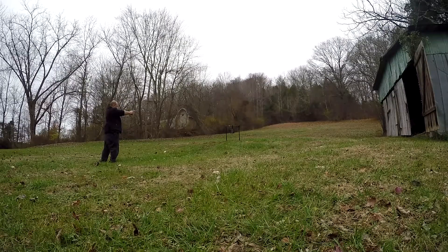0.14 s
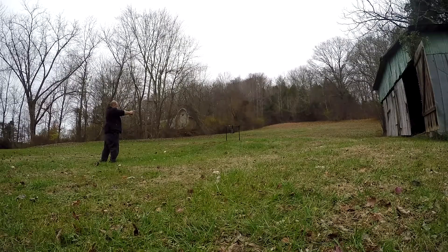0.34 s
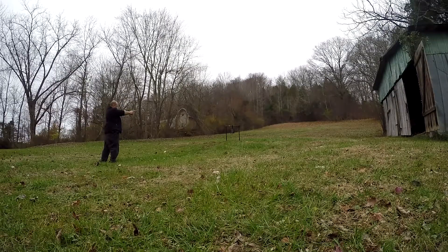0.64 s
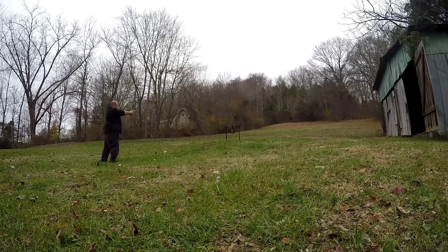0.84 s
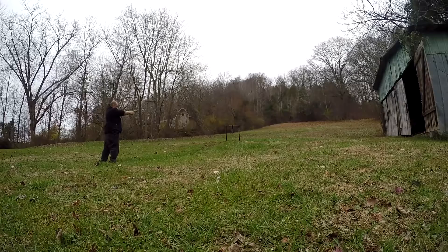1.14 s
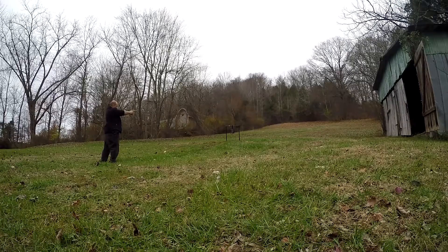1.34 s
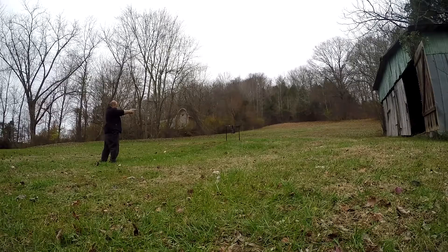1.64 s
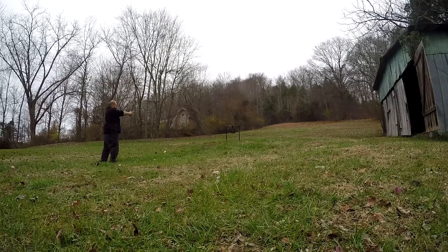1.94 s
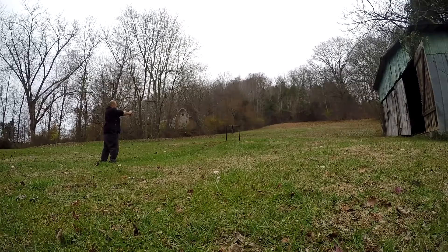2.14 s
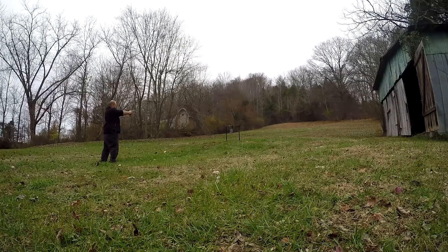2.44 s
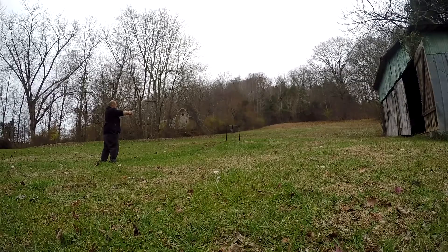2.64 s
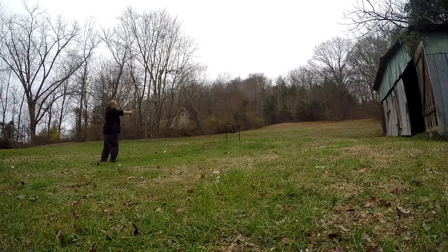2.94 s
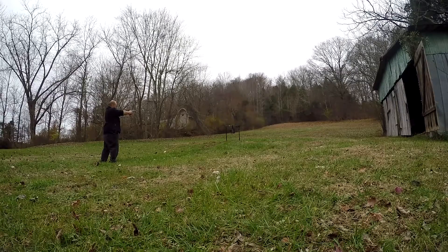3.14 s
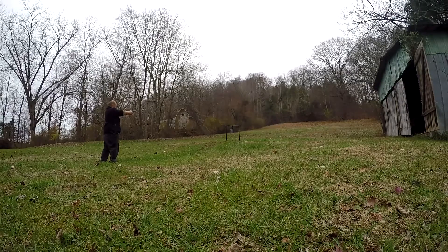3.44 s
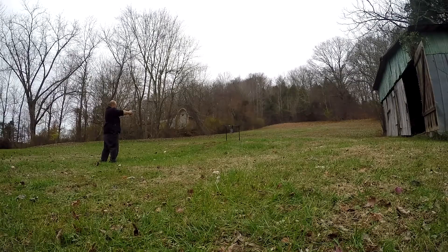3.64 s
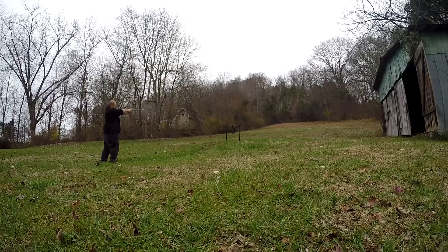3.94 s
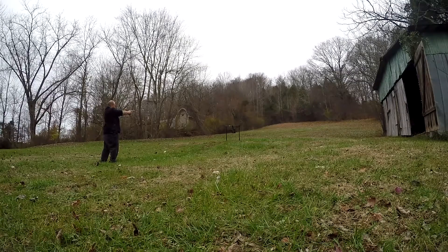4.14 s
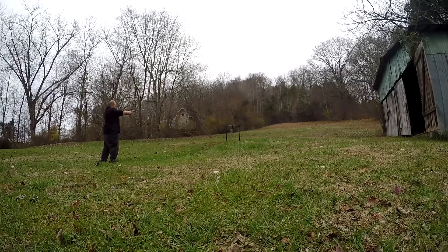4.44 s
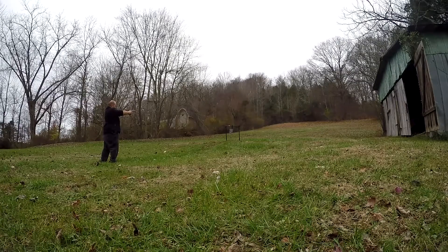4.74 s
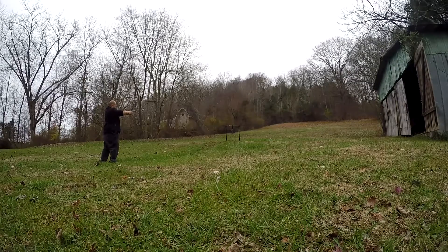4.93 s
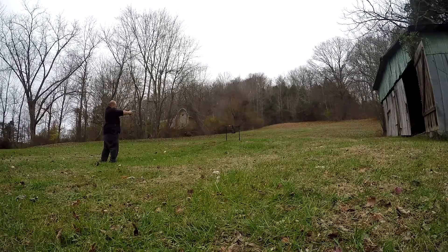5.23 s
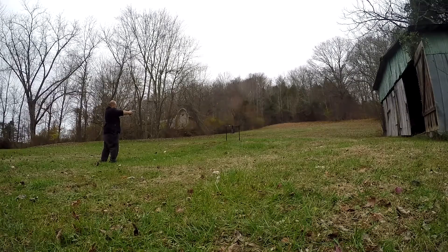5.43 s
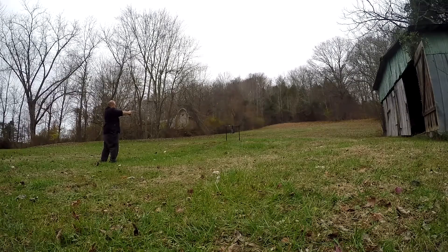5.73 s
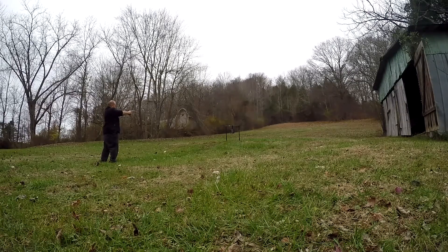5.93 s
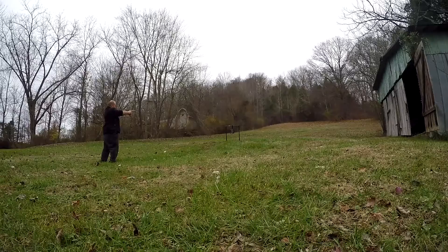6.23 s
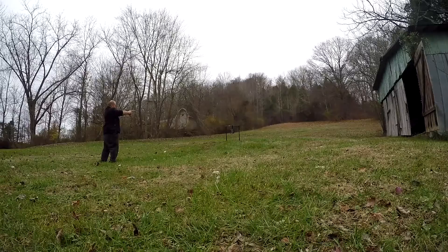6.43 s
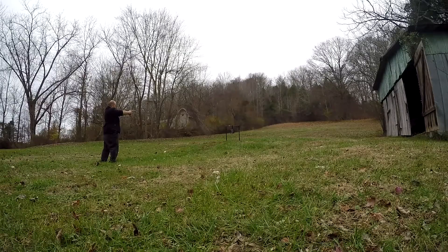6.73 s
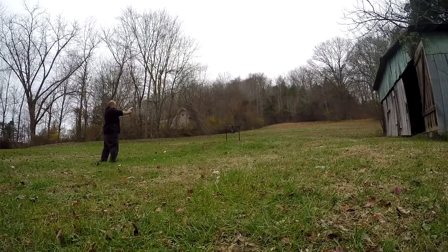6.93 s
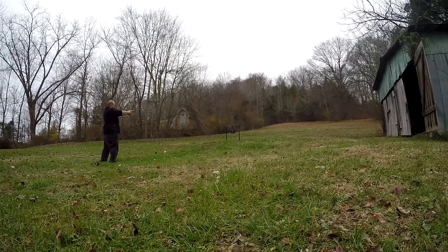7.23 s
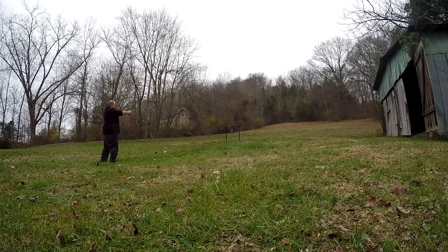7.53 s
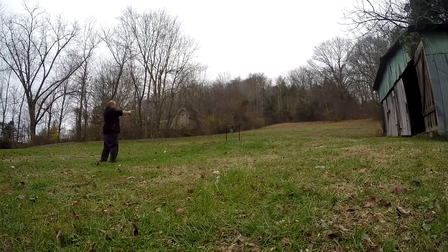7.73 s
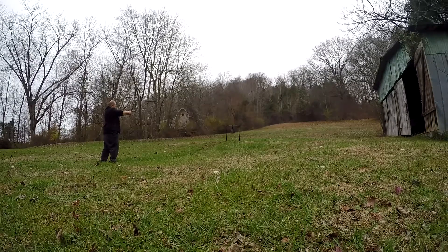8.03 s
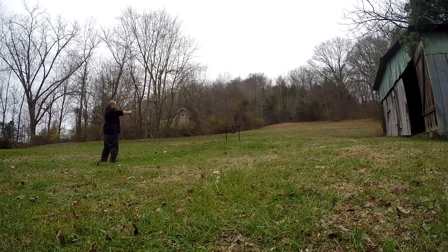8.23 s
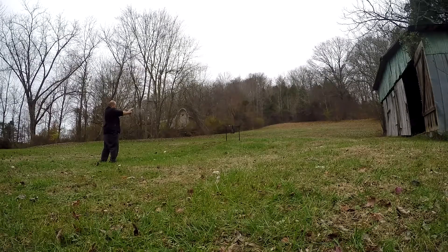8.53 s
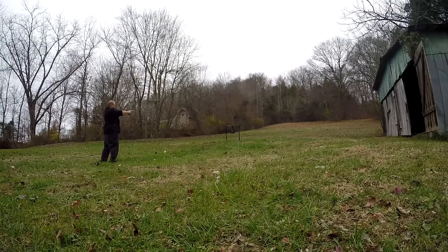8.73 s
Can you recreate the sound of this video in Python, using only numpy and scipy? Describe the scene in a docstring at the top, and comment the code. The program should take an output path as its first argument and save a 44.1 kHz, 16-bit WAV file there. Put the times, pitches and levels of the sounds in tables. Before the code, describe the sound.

Outdoor target shooting in an open field, heard by a small overloaded microphone on the ground. Soft gusty wind comes first, then five cracking handgun blasts roughly one and a half to two seconds apart. Each hits steel with a bright smack and high ring, then shed and tree line return a dense rolling echo. The level ducks at every shot and creeps back up; a few tiny handling clicks intervene.

```python
"""A light wind, hiss and a thin whine, then five pistol shots at a steel plate in a grass field, a shed and woods near.
Each blast rings and overloads a small camera on the ground; grass noise and a low swing follow.
The plate pings about 30 ms after the shot and its high ring swells, then shed and woods return the echo.
Gain control ducks at every shot and creeps up again over the echo and wind; small clicks fall between shots.
Sources are decaying sines and noise shaped in bands."""
import sys
import numpy as np
from scipy import signal
from scipy.io import wavfile
from scipy.ndimage import uniform_filter1d

SR = 44100
rng = np.random.default_rng(int(sys.argv[2]) if len(sys.argv) > 2 else 0)


def transcribe(signal):
    """Save signal, clipped to [-1, 1], as a 16-bit WAV file at the path in sys.argv[1]."""
    frames = np.atleast_2d(signal).T
    limited = np.clip(frames, -1, 1)
    pcm = np.round(limited * 32767).astype(np.int16)
    wavfile.write(sys.argv[1], SR, pcm)


N = 391166
TIME = np.arange(N) / SR
AGE = TIME[:3 * SR]   # time since an event, s


def from_db(db):
    """Decibels to gain."""
    return 10 ** (np.asarray(db) / 20)


def rms_one(x):
    """Scale to rms 1."""
    return x / np.sqrt(np.mean(x ** 2) + 1e-20)


def fade(t, t60):
    """Decay by 60 dB in t60 seconds."""
    return np.exp(-np.log(1000) * t / t60)


def swell(t, start_s, rise_s):
    """Smooth opening from 0 towards 1 after a start time."""
    return 1 - np.exp(-(np.maximum(t - start_s, 0) / rise_s) ** 2)


def add(track, s, sound):
    """Mix a sound into a track at s seconds."""
    at = round(s * SR)
    track[at:at + len(sound)] += sound[:N - at]


def butter(x, hz, kind, order=2):
    """Causal Butterworth filter."""
    sos = signal.butter(order, hz, kind, fs=SR, output="sos")
    return signal.sosfilt(sos, x + 1e-18)


def mode(hz, t60):
    """A struck resonance: decaying sine, height 1 before decay."""
    return np.sin(2 * np.pi * hz * AGE) * fade(AGE, t60)


def lumps(t, per_s, depth_db):
    """Random gain, interpolated in dB between per_s knots a second."""
    knots = rng.standard_normal(4000)
    return from_db(depth_db * np.interp(t * per_s, np.arange(len(knots)), knots))


def coloured(table, t, patchy_db=0):
    """Noise in bands, rms 1 before decay and wavering; a third table column is the t60 of each band."""
    hz, db, *t60 = np.transpose(table)
    edges_hz = np.geomspace(15, 17000, 25)
    white = rng.standard_normal((2, len(t) + SR // 10))   # extra 0.1 s lets the filters settle
    out, power = 0, 0
    for k, (low, high) in enumerate(zip(edges_hz, edges_hz[1:])):
        log_centre = np.log(low * high) / 2
        gain = from_db(np.interp(log_centre, np.log(hz), db))
        band = gain * butter(white[k % 2], [low, high], "band")[-len(t):]
        if patchy_db:
            band = band * lumps(t, per_s=16, depth_db=patchy_db)
        if t60:
            band = band * fade(t, np.interp(log_centre, np.log(hz), t60[0]))
        out = out + band
        power += gain ** 2 * (high - low) / (SR / 2)
    return out / np.sqrt(power)


def background(air_db=-61.5, whine_db=-71.0, whine_hz=8020, buzz_hz=98, wander_hz=14):
    """Faint hiss, and a thin whine: a sine wandering in pitch, its amplitude modulated at buzz_hz."""
    # still air: (frequency [Hz], relative density [dB per Hz])
    air_spectrum = [(20, 4.5), (400, 1), (1000, -0.5), (2000, -4.5), (5500, -3.5), (7000, -13),
                    (10000, -11), (15000, -30.5)]
    wander = rms_one(butter(rng.standard_normal(N), 30, "low"))
    pitch_hz = whine_hz + wander_hz * wander
    buzz = 1 + 1.8 * np.sin(2 * np.pi * buzz_hz * TIME)
    whine = np.sin(2 * np.pi * np.cumsum(pitch_hz) / SR) * buzz
    return from_db(air_db) * coloured(air_spectrum, TIME) + from_db(whine_db) * whine


def wind(breeze_db=-41.5, rise_over_fall=0.5):
    """A steady breeze rumbles on the microphone; each gust builds faster than it dies away."""
    # wind rumble: (frequency [Hz], relative density [dB per Hz])
    rumble = [(15, 0), (30, -2), (60, -6), (100, -13.5), (160, -25), (300, -38.5), (600, -66.5),
              (2000, -95)]
    # gusts: (peak time [s], level [dB], fall time [s])
    gusts = [(.03, -34.5, 0.19), (.36, -31.5, 0.051), (0.511, -33, 0.15), (.97, -34, 0.084),
             (1.35, -42.5, .2), (3.13, -41, 0.084), (4.55, -34, 0.31), (5.15, -34, 0.12),
             (6.74, -28, 0.097), (7.5, -39, .3)]
    strength = from_db(breeze_db)
    for s, db, fall_s in gusts:
        width_s = np.where(TIME < s, rise_over_fall * fall_s, fall_s)
        strength = strength + from_db(db) * np.exp(-((TIME - s) / width_s) ** 2)
    return strength * coloured(rumble, TIME, patchy_db=2.0)


def handling(t60=0.015):
    """Short dry clicks of the pistol being handled: decaying band noise."""
    # clicks: (time [s], peak level [dB], frequency [Hz])
    clicks = [(3.1948, -48, 6570), (4.8094, -35.5, 8700), (4.839, -43, 8400), (6.8459, -19.5, 4300),
              (6.8535, -31.5, 5570), (8.2487, -47, 4220), (8.3679, -43, 4940), (8.4367, -42.5, 4180),
              (8.4986, -48, 6130)]
    out, t = np.zeros(N), AGE[:SR // 10]
    for s, db, hz in clicks:
        band_hz = [hz * 0.86, min(hz * 1.21, SR / 2.2)]
        click = butter(rng.standard_normal(len(t)), band_hz, "band") * fade(t, t60)
        add(out, s, from_db(db) * click / np.abs(click).max())
    return out


def slaps(count=14, level_db=-5.0, dull_hz=4500, t60=0.61):
    """Boards and near trunks return separate dulled copies of the blast, the same at every shot."""
    out, copy = np.zeros(len(AGE)), butter(blast(0), dull_hz, "low")
    delays_s = np.linspace(.05, .19, count) + rng.uniform(-.004, .004, count)
    for delay_s, db in zip(delays_s, rng.normal(0, 1.7, count)):
        add(out, delay_s, from_db(level_db + db) * fade(delay_s - .05, t60) * copy)
    return out


def echoes(grass_db=15, shed_db=5, woods_db=-18):
    """Decaying noise: grass scatters the blast at once, shed and nearest trees soon after, woods for seconds."""
    # grass, shed with nearest trees, woods: (frequency [Hz], relative density [dB per Hz], t60 [s])
    grass_bands = [(60, -12, 0.2), (204, 5, 0.054), (403, -1, 0.074), (676, -4, 0.066), (1370, 1.5, 0.058),
                   (2160, -12, 0.071), (4200, -13.5, 0.14), (5600, -5.5, 0.074), (8500, -27.5, 0.098),
                   (15000, -24, 0.061)]
    shed_bands = [(60, -9.5, .4), (170, -3, 0.46), (300, -3, 0.4), (700, 1.5, .33), (1173, -4, 0.49),
                  (2380, -10.5, 0.48), (4626, -11.5, 0.55), (6030, -8.5, .38), (8140, -2, 0.18),
                  (15000, -25.5, 0.083)]
    woods_bands = [(64.8, -1, 2.2), (208, -13, 5.32), (470, -7, 3.77), (1080, -0.5, 3.105),
                   (1501, -5.5, 3.02), (2460, -4, 2.18), (4830, -6, 1.874), (5510, 2.5, 1.08),
                   (8000, -9.5, 0.33), (15200, -64, 2.2)]
    t, out = AGE[:SR], np.zeros(len(AGE))

    grass = coloured(grass_bands, t) * swell(t, start_s=.0022, rise_s=.00095)
    add(out, 0, from_db(grass_db) * grass * lumps(t, per_s=400, depth_db=4.5))

    shed = coloured(shed_bands, t) * swell(t, start_s=.027, rise_s=.022)
    add(out, 0, from_db(shed_db) * shed * lumps(t, per_s=180, depth_db=2.0))

    # the far tree line answers late
    far_edge = 1 + 0.61 * swell(AGE, start_s=0.35, rise_s=0.18) * fade(np.maximum(AGE - .7, 0), 7.8)
    # single trees and clumps
    trunks = lumps(AGE, per_s=150, depth_db=1.0) * lumps(AGE, per_s=14, depth_db=1.4)
    woods = coloured(woods_bands, AGE, patchy_db=0.6) * swell(AGE, start_s=0.049, rise_s=0.16)
    return out + from_db(woods_db) * woods * far_edge * trunks


def plate_high_ring(length_factor, level_db=11.0):
    """The plate's high ring swells after the hit, then decays: a sum of damped modes."""
    # high ring: (frequency [Hz], relative level [dB], t60 before length factor [s])
    high_ring_modes = [(5995, 0, .35), (6000, -33, 1.0), (6750, -21, .12), (9600, -30, .55),
                       (10200, -32, .55), (11550, -27, .35), (12600, -35, .85), (12820, -34, .5)]
    ring = 0
    for hz, db, t60 in high_ring_modes:
        ring = ring + from_db(db + rng.normal(0, 1)) * mode(hz, t60 * length_factor)
    return from_db(level_db) * ring * swell(AGE, start_s=.04, rise_s=.034)   # age counts from the shot


def plate(smack_t60=.006, spray_db=-17.0, spray_t60=0.051, shed_db=-14.0, shed_hz=6000, shed_return_s=.068,
          linger_db=-41.5, linger_t60=3.2):
    """Lead smacks steel, fragments spray, the plate rings; the shed returns the smack, the woods the ring."""
    # hits: (time [s], smack level [dB], levels of the three main modes, set by where it lands [dB])
    hits = [(1.6586, 10.2, -0.5, -5, -10.5), (3.8695, 15, -12.5, -16.5, -22), (5.5356, 16, 6, -38, 9),
            (6.9684, 17, -12.5, -5, -15.5), (8.5750, 9.6, -14, -2.5, -14)]
    # main plate modes: (frequency [Hz], t60 [s])
    main_modes = [(2398, 0.45), (2912, 0.15), (3602, 0.26)]
    # upper plate modes, struck by every smack: (frequency [Hz], level re smack [dB], t60 [s])
    upper_modes = [(3980, -29.5, .1), (6600, -28.5, 0.1), (5995, -17, 0.08)]
    # smack of lead on steel: (frequency [Hz], relative density [dB per Hz])
    smack_spectrum = [(300, -18), (1200, 0.5), (2000, 9), (4500, 5), (6500, -3.5), (9000, -31.5),
                      (15000, -31.5)]
    out, t = np.zeros(N), AGE[:SR // 2]
    # the struck plate swings edge-on and radiates less
    facing = from_db(-17 * swell(AGE, start_s=0.039, rise_s=.055))
    for s, smack_db, *mode_db in hits:
        decay = fade(t, smack_t60) + from_db(spray_db) * fade(t, spray_t60)
        smack = from_db(smack_db) * coloured(smack_spectrum, t) * decay
        add(out, s, smack)
        add(out, s + shed_return_s, from_db(shed_db) * butter(smack, shed_hz, "low", order=4))
        for (hz, t60), db in zip(main_modes, mode_db):
            # the air swallows higher modes sooner
            woods_t60 = linger_t60 * (main_modes[0][0] / hz) ** 2
            linger = from_db(linger_db) * mode(hz, woods_t60) * lumps(AGE, per_s=28, depth_db=2.5)
            add(out, s, from_db(db) * (mode(hz, t60) * facing + linger))
        for hz, db, t60 in upper_modes:
            add(out, s, from_db(smack_db + db) * mode(hz, t60))
    return out


def thump(suction_s, suction_db, swing_db=23.5, swing_t60=0.095, swing_hz=23, swing_start_s=.005):
    """Suction follows the front; the overloaded microphone then swings slowly back to rest."""
    t = AGE[:SR // 4]
    phase = np.minimum(t / suction_s, 1)
    suction = np.sin(np.pi * phase) * np.minimum(2 * t / suction_s, 1)
    late = np.maximum(t - swing_start_s, 0)
    swing = np.sin(2 * np.pi * swing_hz * late) * fade(late, swing_t60)
    return from_db(swing_db) * swing - from_db(suction_db) * suction


def blast(front_db):
    """The shock front rings the camera housing; a sharper front drives the flagged resonances harder."""
    # housing: (frequency [Hz], width [Hz], relative level [dB], 1 if only a sharp front reaches it)
    housing = [(494, 570, -14, 0), (1023, 324, 0.5, 0), (1463, 380, -1, 0), (2890, 400, -0.5, 1),
               (4225, 500, 3, 1), (5374, 400, 2, 1), (6147, 300, -5.5, 0), (8600, 870, -11, 1),
               (13700, 1700, -10, 1)]
    t, out = AGE[:SR // 20], 0
    for k, (hz, width_hz, db, sharp) in enumerate(housing):
        level = from_db(db + front_db * (sharp > .5))
        ring = np.sin(2 * np.pi * hz * t) * np.exp(-np.pi * width_hz * t)
        out = out + (-1) ** k * level * ring
    return out


def pistol(bounce_db=16.5, bounce_hz=2000, bounce_s=.00813):
    """Each shot: blast, dull bounce from close by, thump, low housing boom, echoes and the plate's high ring."""
    # shots: (time [s], blast [dB], sharp front [dB], suction length [s], suction [dB], boom [dB],
    #         echo and bounce [dB], plate high ring [dB], high ring length factor [1])
    shots = [(1.6279, 32.5, 1, 0.01, 21.5, -3, 0.5, -4, 1.11), (3.839, 34.5, 3, 0.0051, 22, 24, 3, 1, 0.79),
             (5.5064, 46, 0.5, 0.0044, 22, 27.5, 1.5, -4.5, 1.21),
             (6.9385, 33.5, 1, 0.0096, 23.5, 9, 1, 8, 0.6),
             (8.5458, 22, -41, 0.0082, 22.5, -21, -1, 7, 0.64)]
    # low boom of the housing: (frequency [Hz], relative level [dB], t60 [s])
    boom_modes = [(258, 3, 0.021), (377, -9, 0.045), (511, -5, 0.027)]
    out, near = np.zeros(N), slaps()
    bounce = from_db(bounce_db) * butter(blast(0), bounce_hz, "low")
    boom = sum(from_db(db) * mode(hz, t60) for hz, db, t60 in boom_modes)
    for (s, blast_db, front_db, suction_s, suction_db, boom_db,
         echo_db, high_ring_db, high_ring_length) in shots:
        add(out, s, from_db(blast_db) * blast(front_db))
        add(out, s + bounce_s, from_db(echo_db) * bounce)
        add(out, s, thump(suction_s, suction_db))
        add(out, s, from_db(boom_db) * boom)
        add(out, s, from_db(echo_db) * (echoes() + near))
        add(out, s, from_db(high_ring_db) * plate_high_ring(high_ring_length))
    return out


def scene():
    """Everything as it reaches the one microphone."""
    return (background() + wind() + handling() + plate() + pistol())[None]


def gain_control(x, limit_db=0.0, depth_db=20.0, recover_db_per_s=11.5, ahead_s=.013):
    """Peaks pull the gain down just ahead of time; it climbs back at a steady rate in dB."""
    over_db = np.clip(20 * np.log10(np.abs(x) + 1e-9) - limit_db, 0, depth_db)
    recovered_db = recover_db_per_s * TIME
    held_db = np.maximum.accumulate(over_db + recovered_db) - recovered_db
    early_db = np.interp(TIME + ahead_s, TIME, held_db)
    return x * from_db(-uniform_filter1d(early_db, size=200))


def record(dry, cutoff_hz=15650):
    """Gain control, hard overload, and the top cut off by a steep elliptic low-pass."""
    loud = np.clip(gain_control(dry[0]), -1, 1)
    sos = signal.ellip(10, .1, 80, cutoff_hz, fs=SR, output="sos")
    return signal.sosfilt(sos, loud)[None]


dry = scene()
out = record(dry)
transcribe(out)
```